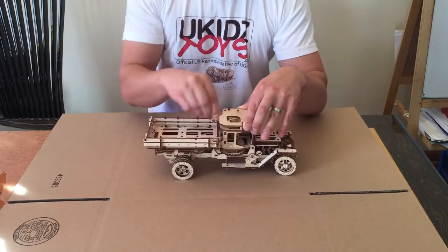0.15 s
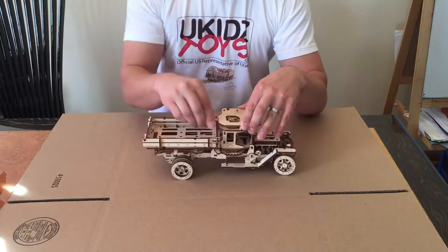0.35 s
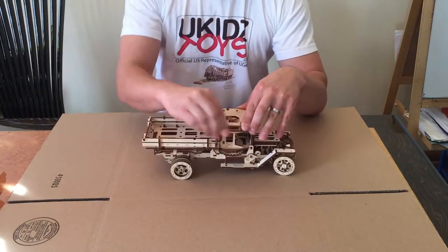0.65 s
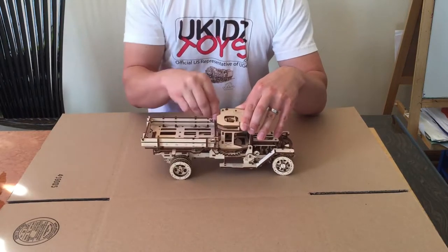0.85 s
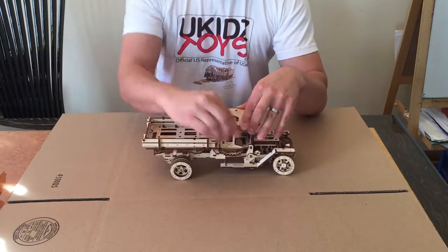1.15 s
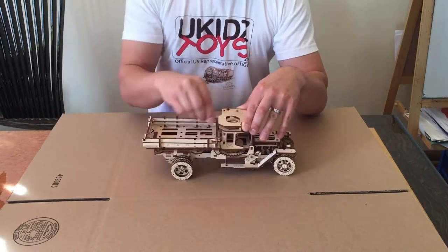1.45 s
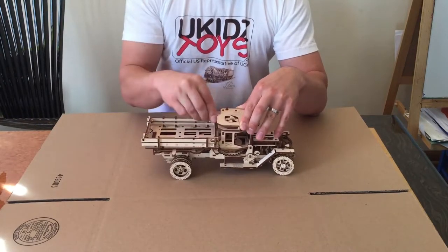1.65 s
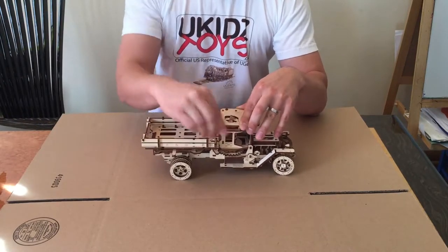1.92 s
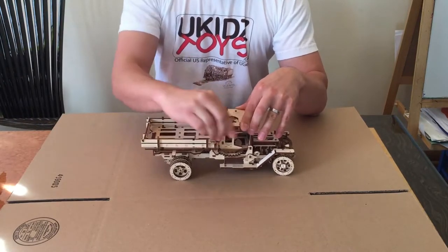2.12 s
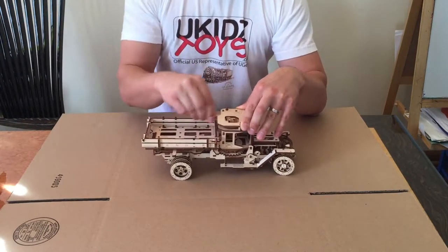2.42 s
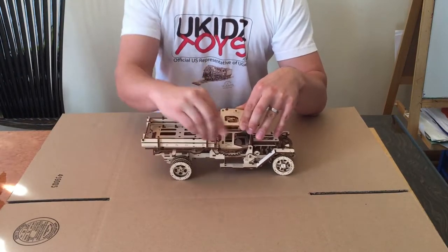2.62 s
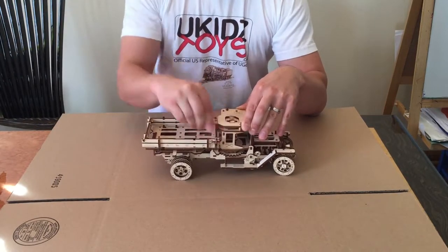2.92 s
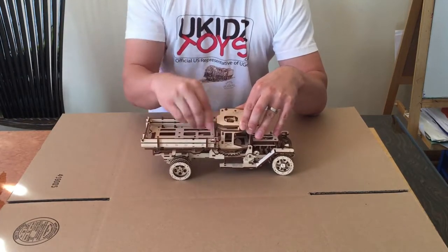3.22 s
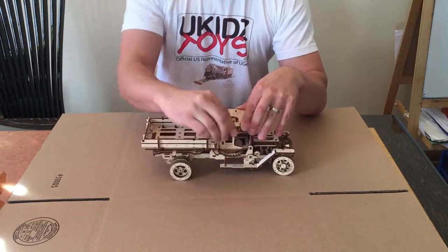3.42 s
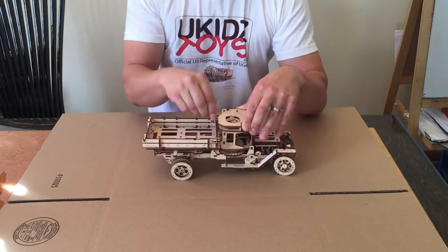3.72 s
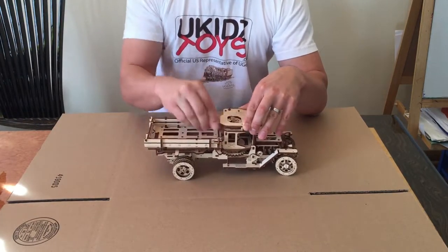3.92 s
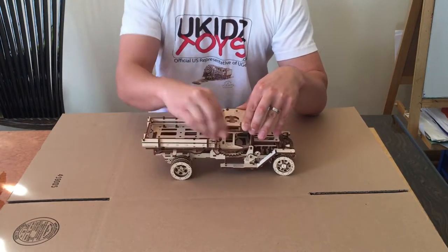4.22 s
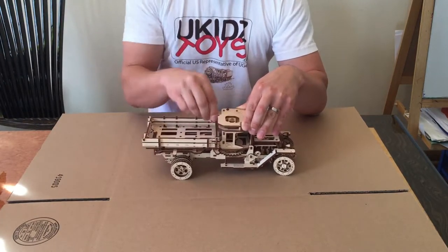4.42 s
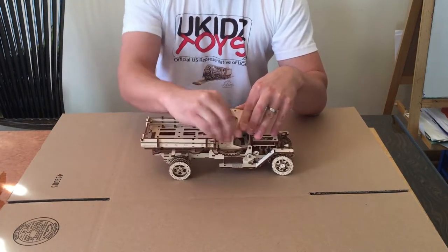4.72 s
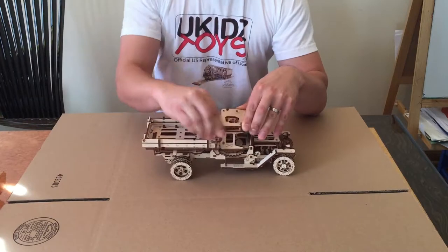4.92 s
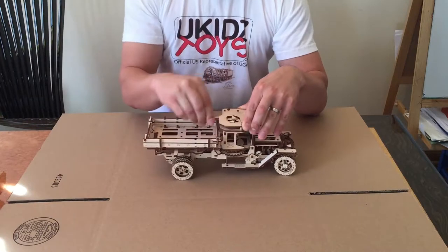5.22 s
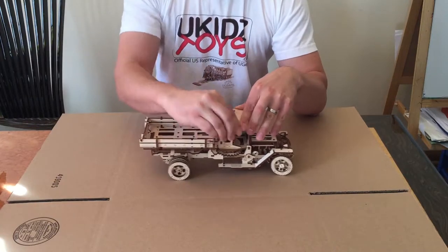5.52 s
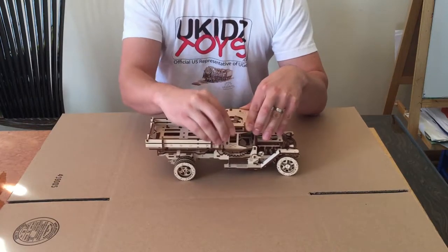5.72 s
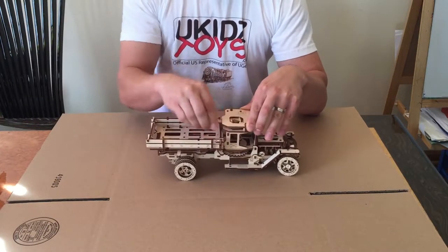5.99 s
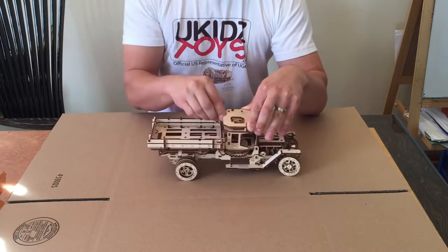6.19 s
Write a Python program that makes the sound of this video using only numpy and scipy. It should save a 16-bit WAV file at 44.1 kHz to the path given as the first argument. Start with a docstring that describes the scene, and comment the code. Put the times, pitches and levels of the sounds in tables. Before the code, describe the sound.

A plywood toy truck stands on a cardboard-covered table while a hand pumps its small lever nine times. Each forward swing gives a rapid burst of five to seven bright, sharp clicks, the first hardest. Between bursts the wood rubs faintly, loose joints tick, cardboard bumps dully, and the lever catches with a light tap and rattle. Close microphone, quiet room with a short reverberation and low rumble.

```python
"""A plywood toy truck on a cardboard-covered table in a quiet room: its small lever is pumped nine times.
Low rumble and a faint hum lie under it all, and wood rubs softly as the lever is drawn back.
The cardboard bumps dully and loose joints tick; before each swing the lever catches with a tap and a rattle.
Each swing then snaps the pawl over five to seven teeth: brief damped modes ring the thin frame, noise
chatters in its slats. Near surfaces and the room answer each sound of the toy, up to the microphone's band limit."""
import sys
import numpy as np
from scipy import signal
from scipy.fft import rfft, irfft, next_fast_len
from scipy.io import wavfile
from scipy.ndimage import uniform_filter1d, minimum_filter1d, map_coordinates

SR = 44100
rng = np.random.default_rng(int(sys.argv[2]) if len(sys.argv) > 2 else 0)


def wrap_up_sound(samples):
    """Save the sound to the file named by the first command line argument, as 16-bit audio."""
    columns = np.atleast_2d(samples).T
    # keep every value between -1 and 1, then stretch to whole-number steps
    tamed = np.clip(columns, -1, 1)
    steps = np.round(tamed * 32767).astype(np.int16)
    wavfile.write(sys.argv[1], SR, steps)


N = 280035
T = np.arange(SR // 8) / SR  # time axis of one short sound [s]


def amp(db):
    """Decibels to gain."""
    return 10 ** (np.asarray(db) / 20)


def unit(x):
    """Scale to rms 1."""
    return x / np.sqrt(np.mean(x ** 2) + 1e-20)


def along(points, hz):
    """Read (frequency [Hz], value) points on a log frequency axis."""
    f, v = np.transpose(points)
    return np.interp(np.log(hz + 1), np.log(f), v)


def fade(t60, t=T):
    """Exponential decay, 60 dB down after t60 seconds."""
    return np.exp(-np.log(1000) * t / t60)


def noise(spectrum, size):
    """Noise of rms 1, coloured by (frequency [Hz], level [dB]) points."""
    white = rfft(rng.standard_normal(size))
    gain = amp(along(spectrum, np.fft.rfftfreq(size, 1 / SR)))
    return unit(irfft(white * gain, size))


def wobble(rate):
    """A smooth random curve with rate knots a second."""
    knots = rng.standard_normal(int(N * rate / SR) + 4)
    return map_coordinates(knots, [np.arange(N) * rate / SR])


def mode_sines(hz, db, scatter_db, detune):
    """Steady sines at the modes of a body, a little different in level and pitch at every blow."""
    size, shift = rng.standard_normal((2, len(hz), 1))
    return amp(db + scatter_db * size) * np.sin(2 * np.pi * hz * (1 + detune * shift) * T)


def ring(modes, scatter_db, detune):
    """A struck body: each mode dies away at its own pace."""
    hz, db, t60 = np.transpose(modes)[:, :, None]
    return np.sum(fade(t60) * mode_sines(hz, db, scatter_db, detune), axis=0)


def add(track, s, sound):
    """Mix a sound in at time s, or at the very start if s is negative."""
    part = track[max(round(s * SR), 0):][:len(sound)]
    part += sound[:len(part)]


def by_chance(typical, count, scatter_db, octaves):
    """Event rows at random times, scattered in level and pitch around a typical one."""
    db, hz, *rest = typical
    rows = []
    # a few draws may fall before the start; add() puts them at the start
    for when, size, shift in rng.uniform(-1.1, 1, (count, 3)):
        s = (when + 1) / 2 * N / SR
        rows.append((s, db + scatter_db * size, hz * 2 ** (octaves * shift), *rest))
    return rows


# colour of the low room rumble: (frequency [Hz], level [dB])
RUMBLE = [(20, -27), (35, -14.5), (60, 1.5), (100, -3), (155, -7), (200, -2.5), (290, -11), (600, -18.5),
          (1150, -18), (2000, -20), (6000, -24.5), (12500, -33.5), (15000, -62.5)]


def background(air_db=-66.0, hum_db=-71.0):
    """Low room rumble that swells and sinks, and a faint 120 Hz mains hum."""
    hum = amp(hum_db + 2.1 * wobble(0.89)) * np.sin(2 * np.pi * 120 * np.arange(N) / SR)
    rumble = amp(air_db + 1.2 * wobble(1.4)) * noise(RUMBLE, N)
    return hum + rumble


# how the hand's extra time is shared out: part left one tooth further in, gathering speed and braking
GATHER, BRAKE = .728, .253
# the first tooth snaps hardest: extra [dB], share of it left at each next tooth
FIRST_DB, FIRST_LEFT = 3, 0.22


def snaps(swing):
    """Rows (time [s], level [dB]), one a tooth: hard at first; the hand gathers speed, then brakes."""
    start, teeth, tooth_s, first_extra_s, last_extra_s, db = swing
    k = np.arange(round(teeth))
    gathering = first_extra_s * GATHER ** k[:-1]
    braking = last_extra_s * BRAKE ** k[:-1][::-1]
    times = start + np.append(0, np.cumsum(tooth_s + gathering + braking))
    return np.column_stack([times, db + FIRST_DB * FIRST_LEFT ** k])


# colour of wood sliding on wood: (frequency [Hz], level [dB])
RUBBING = [(200, -15.5), (700, -5.5), (1200, 3), (3500, 3.5), (6200, 9.5), (7600, 4), (13000, 5.5),
           (14200, -19.5), (15500, -46)]
# the hand rests after a swing, draws back for at most RETURN_S, pauses before the catch [s]
REST_S, RETURN_S, PAUSE_S = .08, 0.39, .075


def rubbing(edge=0.034, grain_db=-0.5, first_snap_db=-51.5, lead=0.047):
    """Wood slides unevenly on wood on each return; a faint rub surrounds the first snap of each swing."""
    t = np.arange(N) / SR
    slides, back = [], -edge
    for swing, (catch, _, return_db) in zip(SWINGS, CATCHES):
        first, last = snaps(swing)[[0, -1], 0]
        slides.append((back, min(back + RETURN_S, catch - PAUSE_S), return_db))
        slides.append((first - lead, first + edge, first_snap_db))
        back = last + REST_S
    motion = np.zeros(N)
    for start, end, db in slides:
        motion += amp(db) * np.clip(np.minimum(t - start, end - t) / edge, 0, 1)
    # fine grain and slower unevenness
    grain = amp(grain_db * wobble(110) + 3.2 * wobble(14) - 5.0)
    return motion * grain * noise(RUBBING, N)


# hands and wheels bump softly on the cardboard: (time [s], level [dB], pitch [Hz])
BUMPS = [(0.125, -45, 126), (0.2, -40.5, 120), (1.859, -46.5, 105), (2.399, -45, 114), (2.63, -43, 56),
         (3.356, -43.5, 122.4), (5.068, -41.5, 71.5), (5.867, -48, 121)]
# a typical fainter bump, come by chance: (level [dB], pitch [Hz])
FAINT_BUMP = (-53.5, 120)


def bumps(thud_db=-0.5, scuff_db=-16):
    """Soft pushes on the cardboard: one low mode thuds under a faint scuff of noise."""
    track = np.zeros(N)
    swell = (1 - fade(0.22)) * np.cos(np.pi / 2 * T / T[-1])
    scuff_colour = [(60, -10.5), (330, 4), (700, -8.5), (1400, -8.5), (4000, -24)]
    for s, db, hz in BUMPS + by_chance(FAINT_BUMP, count=10, scatter_db=3.5, octaves=.9):
        thud = amp(thud_db) * ring([(hz, 0, .22)], scatter_db=4.0, detune=0.018)
        scuff = amp(scuff_db) * noise(scuff_colour, len(T)) * fade(.25)
        add(track, s, amp(db) * swell * (thud + scuff))
    return track


# the lever takes up its play: (time [s], level [dB], level of the rubbing on the way back [dB])
CATCHES = [(0.158, -37, -56), (0.8268, -34.5, -59.5), (1.492, -39.5, -58), (2.329, -44.5, -60.5),
           (3.0164, -36.5, -63.5), (3.744, -40.5, -62.5), (4.385, -41.5, -61), (5.046, -39, -62),
           (6.0673, -46.5, -64)]
# colour of the lever rattling in its slot: (frequency [Hz], level [dB])
LEVER = [(1500, -19), (2700, -15.5), (3400, -7.5), (4200, 0.5), (5000, -2), (6200, -15), (7600, -13.5),
         (10000, -28), (16000, -50)]
# colour of a joint's dry tap, heard in the ticks too: (frequency [Hz], level [dB])
JOINTS = [(300, -20), (1200, -6), (3000, -2.5), (5500, 2.5), (7500, -4), (9000, -2), (11000, -9),
          (13500, -12.5), (15000, -38.5)]


def catches(ring_db=-14.0, tap_db=-11.5):
    """The lever knocks lightly against its stop as it turns round, and rattles in its slot."""
    track = np.zeros(N)
    for s, db, _ in CATCHES:
        tap = amp(tap_db) * noise(JOINTS, len(T)) * fade(0.048)
        rattle = amp(ring_db) * noise(LEVER, len(T)) * fade(0.085)
        add(track, s, amp(db) * (tap + rattle))
    return track


# ticks under the hands: mostly loose joints, some the lever reaching its back stop at the end of a return:
# (time [s], level [dB], pitch [Hz], ring relative to the tick [dB])
TICKS = [(0.2006, -36.5, 5250, -18), (0.4763, -32.5, 6060, -6.5), (0.7317, -43.5, 3220, -14),
         (1.8553, -28.5, 4770, -18.5), (1.9829, -43, 1400, -12.5), (4.045, -48.5, 1085, -4),
         (5.1028, -45, 5000, -17), (5.6335, -39, 4460, -27), (5.7677, -30, 3100, -18.5),
         (5.9553, -39.5, 2130, -11.5)]
# a typical fainter tick, come by chance: (level [dB], pitch [Hz], ring relative to the tick [dB])
FAINT_TICK = (-52, 2000, -16)


def ticks(tap_db=-8):
    """Loose joints slip, or the lever strikes its back stop: a dry tap, coloured by the part that moved."""
    track = np.zeros(N)
    for s, db, hz, ring_db in TICKS + by_chance(FAINT_TICK, count=8, scatter_db=-1, octaves=0.61):
        tap = amp(tap_db) * noise(JOINTS, len(T)) * fade(.023)
        colour = [(hz / 2, -25), (hz * .8, -7), (hz, 0), (hz * 1.2, -12), (hz * 3, -25), (SR, -50)]
        part = noise(colour, len(T)) * fade(.045)
        add(track, s, amp(db) * (tap + amp(ring_db) * part))
    return track


# the pawl's modes: (frequency [Hz], level [dB])
PAWL = [(650, -43), (2750, -28), (4200, -16), (6170, 2.5), (8600, -7), (10400, -12), (11900, -15),
        (13250, -9.5), (15300, -18)]


def snap(length, detune, scatter_db):
    """The pawl quivers in its modes for length seconds, until it seats on the next tooth."""
    hz, db = np.transpose(PAWL)[:, :, None]
    quiver = np.sin(np.pi * np.clip(T / length, 0, 1)).clip(0) ** 0.93
    return quiver * np.sum(mode_sines(hz, db, scatter_db, detune), axis=0)


# forward swings of the lever: (first snap [s], teeth [count], time per tooth at full speed [s],
# extra on the first tooth [s], extra on the last tooth [s], level [dB])
SWINGS = [(.2449, 7, .0155, .0116, .0166, -6.3), (.9051, 7, .0157, .0142, .0262, -6.4),
          (1.5780, 7, .0217, .0046, .0046, -5.9), (2.4202, 6, .0185, .0097, .0071, -6.3),
          (3.1014, 7, .0184, .0128, .0167, -6.1), (3.7892, 5, .0262, 0, .0098, -5.3),
          (4.4711, 6, .0216, .0065, .006, -5.8), (5.1625, 6, .0219, .0085, .0052, -5.4),
          (6.1661, 6, .0191, .0191, .0047, -5.8)]
# the plywood frame's modes: (frequency [Hz], level [dB], t60 [s])
FRAME = [(129.5, -46.5, 0.026), (496, -46, 0.0077), (986, -48.5, 0.087), (1138, -38, 0.046),
         (1346, -53, 0.042), (1864, -43, 0.11), (2170, -41.5, 0.085), (2810, -29, 0.017),
         (2870, -42.5, 0.073), (4290, -31.5, 0.017), (4600, -33, 0.028), (5160, -29.5, 0.14),
         (6060, -37.5, .014), (6840, -31.5, .016), (6970, -33, 0.022), (8660, -32, 0.035), (9510, -36, .02)]
# colour of the slats chattering after a snap: (frequency [Hz], level [dB])
SLATS = [(30, -51.5), (300, -43), (820, -25.5), (1000, -6), (1250, -16), (1500, -18), (2100, -9.5),
         (3300, -7.5), (4700, -2.5), (5400, -2.5), (6450, 7), (7600, 0.5), (8700, 0.5), (9800, -4.5),
         (13300, -7.5), (16000, -13.5)]
TOOTH_SCATTER_DB = .5  # teeth differ a little


def ratchet(snap_db=-3.5, frame_db=-4, chatter_db=-15, rattle_db=-26.5, seat=0.001169):
    """Each tooth snaps the pawl; as it seats, the frame rings and its slats chatter."""
    track = np.zeros(N)
    # the chatter takes a moment to spread through the slats; the frame rings at once
    spread = 1 - fade(0.00096)
    decay = amp(chatter_db) * fade(0.012) + amp(rattle_db) * fade(0.038)
    for s, db in np.vstack([snaps(swing) for swing in SWINGS]):
        db = db + TOOTH_SCATTER_DB * rng.standard_normal()
        slats = noise(SLATS, len(T)) * decay * spread
        frame = amp(frame_db) * ring(FRAME, scatter_db=2.5, detune=0.0095)
        add(track, s, amp(db + snap_db) * snap(seat, detune=0.027, scatter_db=2.4))
        add(track, s + seat, amp(db) * (frame + slats))
    return track


def blend(fixed, new, share):
    """Mix two unrelated noises; share is the power of the new one."""
    share = np.clip(share, 0, 1)
    return np.sqrt(1 - share) * fixed + np.sqrt(share) * new


# table top and nearby surfaces: (delay [s], level [dB])
ECHOES = [(.0016, -20.5), (.0057, -21), (0.0121, -19.5)]
# how long the room rings: (frequency [Hz], t60 [s])
ROOM_T60 = [(200, 1), (1200, 0.3651), (3000, 0.35), (6000, 0.51), (9000, 0.39), (15000, 0.27)]
# how strongly the room answers: (frequency [Hz], level [dB])
ROOM_DB = [(200, -15.5), (750, -15), (1050, -1.5), (2000, 1.5), (4000, -2.5), (6000, -15.5), (8500, -9),
           (11000, -11), (15000, -19.5)]


def room(x, count=48, moving=.75):
    """Near surfaces echo at once; part of the diffuse tail changes as hands and toy move."""
    out = x.copy()
    for delay, db in ECHOES:
        add(out, delay, amp(db) * x)
    walls = rng.standard_normal(SR * 2 // 3)
    for part in np.array_split(np.arange(N), count):
        diffuse = blend(walls, rng.standard_normal(len(walls)), moving)
        hz, t, z = signal.stft(diffuse, SR, nperseg=256)
        t60 = along(ROOM_T60, hz)[:, None]
        # level out the energy of long and short decays
        gain = amp(along(ROOM_DB, hz))[:, None] * np.sqrt(2 * np.log(1000) / (t60 * SR))
        tail = signal.istft(z * gain * fade(t60, t), SR, nperseg=256)[1]
        add(out, part[0] / SR + .004, signal.fftconvolve(x[part], tail))
    return out


def scene():
    """The toy in its room, over the background."""
    toy = rubbing() + bumps() + catches() + ticks() + ratchet()
    return (room(toy) + background())[None]


LOW_HZ, TOP_HZ = 49.4, 16500  # the microphone's bass roll-off and band limit


def record(dry):
    """A fast limiter holds the snaps down; the microphone drops deep bass and all above its band limit."""
    needed = np.minimum(1, .74 / (np.abs(dry) + 1e-9))
    held = dry * uniform_filter1d(minimum_filter1d(needed, size=21), size=11)
    size = next_fast_len(N + SR)
    hz = np.fft.rfftfreq(size, 1 / SR)
    bass_cut = hz ** 2 / np.sqrt(hz ** 4 + LOW_HZ ** 4)
    top_cut = 1 / (1 + (hz / TOP_HZ) ** 80)
    return irfft(rfft(held, size) * bass_cut * top_cut, size)[:, :N]


dry = scene()
out = record(dry)
wrap_up_sound(out)
```